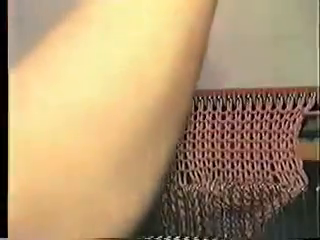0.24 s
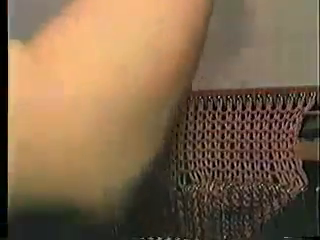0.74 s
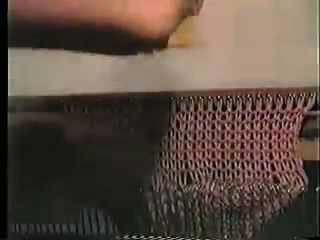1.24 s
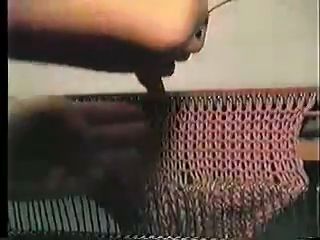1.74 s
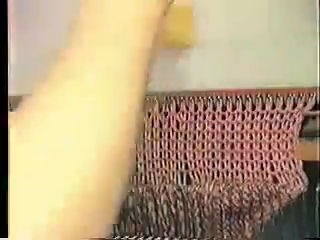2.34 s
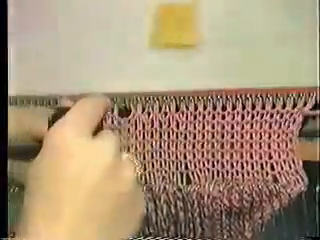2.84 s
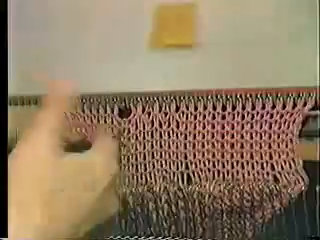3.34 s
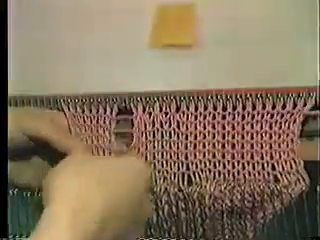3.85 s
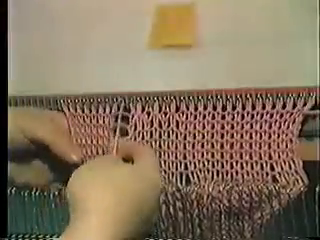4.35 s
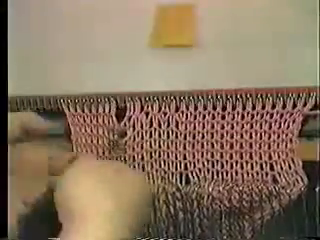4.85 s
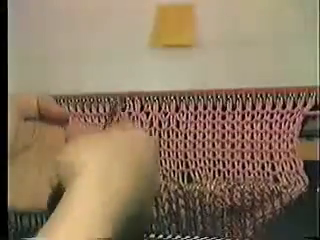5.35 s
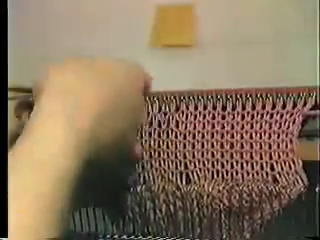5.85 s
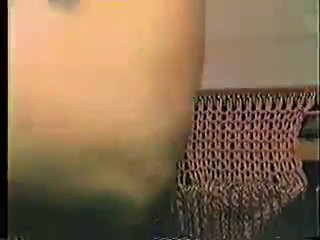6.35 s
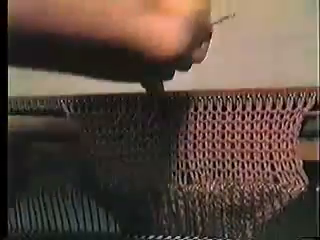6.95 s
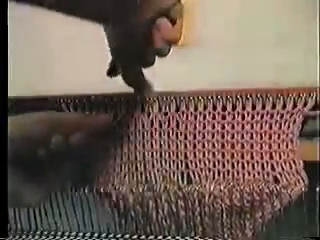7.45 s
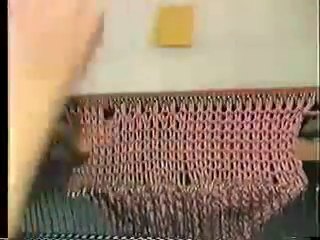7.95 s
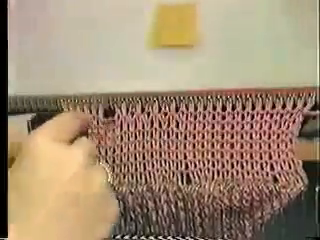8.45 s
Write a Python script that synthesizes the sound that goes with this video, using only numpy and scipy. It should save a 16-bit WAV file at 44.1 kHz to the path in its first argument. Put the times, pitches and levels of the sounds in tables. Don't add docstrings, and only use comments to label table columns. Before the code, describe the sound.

Irregular metallic handling on a needle bed: a couple of early knocks, a tight flurry around two seconds, a bright clack, then a quieter spell with small ticks and a muffled table thump. Louder clacks and sliding needles resume in the last part, ending in faint ticks. Everything is dry and quickly damped, with a short small-room echo, mono, with muffled upper treble, constant hiss, buzzy hum and a thin whine.

```python
import sys
import numpy as np
from scipy import signal
from scipy.io import wavfile
from scipy.ndimage import uniform_filter1d

SR = 44100
rng = np.random.default_rng(int(sys.argv[2]) if len(sys.argv) > 2 else 0)


def boost_factor(decibels):
    exponent = np.asarray(decibels, float) / 20
    return 10 ** exponent


def waveform_to_disk(signal):
    frames = np.transpose(np.atleast_2d(signal))
    scaled = np.clip(frames, -1, 1) * 32767
    samples = np.round(scaled).astype(np.int16)
    wavfile.write(sys.argv[1], SR, samples)


N = 383229
LEAD_S = 0.03
DAMPING = 2.1


def read(points, hz):
    f, value = np.transpose(points)
    return np.interp(np.log(hz + 1), np.log(f + 1), value)


def evened(x):
    return x / np.sqrt(np.mean(x ** 2) + 1e-20)


# (frequency [Hz], density [dB per Hz])
HISS_COLOUR = [(8.8, -53.5), (15, -18), (48, -1.5), (144, -2.5), (177, -4), (207, -4.5), (367, -9),
               (408, -9), (572, -12.5), (651, -12.5), (937, -14), (1010, -10), (1180, -15.5), (1660, -17),
               (7500, -28.5), (9750, -51), (16500, -120)]


def hiss():
    frames, hz = N // 256 + 5, np.fft.rfftfreq(1024, 1 / SR)
    real, imaginary, patches = rng.standard_normal((frames, 513, 3)).T
    patches = uniform_filter1d(patches, 14, 0)
    patches = evened(uniform_filter1d(patches, 10, 1))
    spectrum = (real + 1j * imaginary) * boost_factor(read(HISS_COLOUR, hz)[:, None] + 1.36 * patches)
    noise = signal.istft(spectrum, nperseg=1024, noverlap=768)[1][:N]
    return boost_factor(-41.5) * evened(noise)


# (multiple, level [dB rms])
HUM_LINES = [(1, -52), (3, -54), (5, -67), (7, -68), (9, -61.5), (11, -68), (13, -69), (15, -70.5),
             (17, -70), (21, -76), (25, -69), (27, -66), (31, -83.5), (33, -69), (39, -85)]
# (frequency [Hz], level [dB rms])
DRIVE_WHINE = [(845, -64.5), (996, -71), (1050, -70), (1470, -64.5), (1692, -64), (1865, -65)]


def hum():
    mains_hz = 59.94
    t = np.arange(N) / SR
    lines = [(round(k) * mains_hz, db) for k, db in HUM_LINES] + DRIVE_WHINE
    return sum(np.sqrt(2) * boost_factor(db) * np.sin(2 * np.pi * (hz * t + rng.random())) for hz, db in lines)


def add(mix, s, sound):
    part = mix[round(s * SR):][:len(sound)]
    part += sound[:len(part)]


def contacts(count, uneven_db=2.0, clumps_db=5.0):
    clumps = evened(uniform_filter1d(rng.standard_normal((count, 5000)), 100))
    spikes = np.minimum(rng.exponential(1, (count, 5000)), 4)
    noise = rng.standard_normal((count, 5000))
    return evened(noise * boost_factor(uneven_db * spikes + clumps_db * clumps))


def rattle(noise, length, rise=0.00097, lead_db=-22, lead=0.0066):
    t = np.arange(len(noise)) / SR - LEAD_S
    before = np.minimum(t, 0)
    swell = np.exp(before / rise) + boost_factor(lead_db) * np.exp(before / lead)
    shape = swell * np.exp(-np.maximum(t, 0) / max(length, 1e-3))
    return noise * shape * np.linalg.norm(shape) / np.linalg.norm(noise * shape)


def ring(modes, damping=1):
    t = np.arange(3000) / SR
    y = np.zeros(3000)
    for k, (hz, db, t60) in enumerate(modes):
        decay = boost_factor(db - 60 * damping * t / t60)
        build = 1 - np.exp(-t * hz / 2)
        y += (-1) ** k * decay * build * np.sin(2 * np.pi * hz * t)
    return y / np.linalg.norm(y)


def strike(drive, body):
    sound = signal.fftconvolve(drive, body)
    return sound * np.linalg.norm(drive) / np.linalg.norm(sound)


# (time [s], bed level [dB], small steel parts level [dB], brightness [dB], rattle length [s])
KNOCKS = [(.402, -30, -30.5, 1, 0.014), (.5209, -27.5, -24, 1.3, 0.0064), (1.137, -45, -44, 0, .022),
          (1.703, -41, -30, 0, 0.01), (1.8336, -19, -31, -2.5, 0.0074), (2.0307, -35, -25.5, 2.5, 0.009),
          (2.079, -41, -42, 3, 0.016), (2.1012, -21.5, -21.5, 0.5, .0043), (2.2085, -31.5, -29.5, 0, 0.01),
          (2.6375, -37, -42, 3.5, 0.023), (3.331, -25.5, -30, 3.5, 0.011), (5.045, -24.5, -32.5, 7, 0.0043),
          (5.617, -30, -36.5, 0.5, 0.016), (5.8316, -36, -30, 1, 0.0066), (5.918, -35, -30, 8, .0083),
          (6.229, -39.5, -58, -4, .013), (6.3939, -24, -21.5, -0.5, 0.019), (6.8319, -54, -45, 2, .011),
          (6.995, -38.5, -44.5, -4, 0.017), (7.3567, -22.5, -32.5, -2, 0.009),
          (7.5508, -34, -30.5, -3, 0.0042), (7.604, -22.5, -27.5, 0.5, 0.014)]
# (time [s], bed level [dB], small steel parts level [dB], brightness [dB])
TAPS = [(.165, -38.5, -47, -6.5), (.433, -33, -56, 0), (0.547, -32, -35, -4.5), (1.145, -40, -42, -4.5),
        (1.205, -53, -47, -6.5), (2.001, -38, -39.5, -4), (2.047, -38, -31.5, -9), (2.124, -35, -33.5, 0),
        (3.365, -39, -48, -16), (3.7517, -36.5, -48.5, -2), (5.4952, -34, -40, 1), (5.863, -36, -32, -3),
        (5.887, -37.5, -35, -4), (6.1, -35, -38.5, -2.5), (6.273, -36.5, -61, -5), (6.532, -44, -42.5, -6),
        (7.2975, -37.5, -41.5, -4), (7.587, -32, -39.5, -1), (7.665, -43, -45, 4),
        (7.7017, -36, -45.5, -9.5)]
# (frequency [Hz], level [dB], t60 [s])
BED = [(640, -22, .04), (775, -17, .05), (877, -14, .05), (948, -8, .06), (1040, -6, .06), (1120, 0, .09),
       (1206, -10, .05), (1330, -15, .03)]
PLATES = [(1480, -6, .012), (1700, -5, .012), (1920, -3, .015), (2110, -4, .013), (2300, 0, .018),
          (2500, -2, .018), (2680, -3, .018), (2830, -1, .02), (3080, -4, .012)]
LATCHES = [(3350, -6, .01), (3600, -4, .012), (3800, -2, .013), (4050, 0, .013), (4350, -2, .011),
           (4600, -2, .012), (4800, -1, .013), (5080, -4, .01)]
NEEDLES = [(5350, -6, .009), (5650, -6, .009), (5950, -5, .01), (6300, -4, .011), (6600, -3, .011),
           (6900, -2, .011), (7150, 0, .013), (7400, 0, .013), (7640, 0, .013)]
TABLE_TOP = [(222, -5, 0.019), (430, 2, .015)]
CASING = [(652, -3, 0.0079), (890, -3, 0.014), (1510, -3, 0.0052)]
PITCH_SPREAD = (.02, .008, .04, .03)


def knocks():
    tap_s, held = 0.0088, 2.8
    out = np.zeros(N)
    parts = NEEDLES, BED, PLATES, LATCHES
    dampings = DAMPING, DAMPING * held, DAMPING, DAMPING
    crack = ring([(1840, 0, 0.0011), (3370, -5, 0.0023), (5550, -4.5, 0.0012)])
    rows = KNOCKS + [(*tap, tap_s) for tap in TAPS]
    places = rng.uniform(-1.35, 1, (len(rows), 4, 2, 9))
    noises = contacts(4 * len(rows)).reshape(-1, 4, 5000)
    for (s, bed_db, steel_db, bright_db, length), noise, place in zip(rows, noises, places):
        start = s - LEAD_S
        levels_db = steel_db + bright_db, bed_db, steel_db - bright_db, steel_db - 1.5
        hardness = np.sqrt(0.33 + 0.0014 / length)
        blows = [rattle(row, length, rise=0.18 * length) * hardness for row in noise]
        for modes, db, blow, (shift, weight), spread, damping in zip(
                parts, levels_db, blows, place, PITCH_SPREAD, dampings):
            here = [(hz * (1 + spread * a), mode_db + 2 * b, t60)
                    for (hz, mode_db, t60), a, b in zip(modes, shift, weight)]
            add(out, start, boost_factor(db) * strike(blow, ring(here, damping)))
        add(out, start, boost_factor(bed_db - 20) * strike(blows[1], ring(TABLE_TOP)))
        add(out, start, boost_factor(bed_db - 2) * strike(blows[3], ring(CASING)))
        add(out, start, boost_factor(steel_db - 2) * strike(blows[2], crack))
    return out


# (frequency [Hz], t60 [s])
ROOM_DECAY = [(300, 0.76), (1000, 0.19), (3000, 0.21), (7500, 0.21)]


def room(x):
    hz, t, z = signal.stft(rng.standard_normal((3, SR // 2)), SR, nperseg=256)
    decay = boost_factor(-60 * t / read(ROOM_DECAY, hz)[:, None])
    tails = signal.istft(z * decay, SR, nperseg=256)[1]
    tails *= 1 - np.exp(-np.arange(tails.shape[1]) / SR / 0.001)
    tails /= np.linalg.norm(tails[0])
    turn = 2 * np.pi * (np.arange(N) / SR / 0.37 + np.arange(3)[:, None] / 3)
    sends = x * np.cos(turn) * np.sqrt(2 / 3)
    return signal.fftconvolve(sends, tails, axes=1)[:, :N].sum(0)


# (time [s], level [dB], pitch [Hz])
ACCENTS = [(0.405, -33, 2730), (.521, -28.5, 2460), (.53, -29.5, 2190), (1.705, -47, 2840),
           (2.002, -35.5, 3840), (2.079, -32, 2600), (2.105, -24, 3770), (2.639, -38, 1840),
           (2.645, -42, 6100), (3.331, -22, 4100), (3.331, -27, 1965), (3.332, -24.5, 2850),
           (3.343, -43, 5660), (3.365, -48, 2880), (3.367, -48, 4140), (3.907, -46.5, 5300),
           (5.047, -37, 2400), (5.047, -44.5, 3720), (5.048, -33, 6330), (5.452, -32, 6800),
           (5.617, -37.5, 5230), (5.832, -32.5, 4080), (5.868, -34, 3800), (5.876, -33, 3760),
           (5.922, -42.5, 7650), (6.397, -27, 6180), (6.4, -24, 2350), (7.359, -30.5, 3900),
           (7.556, -28.5, 4800), (7.606, -33.5, 2340),
           (1.85, -39, 744), (2.079, -35, 770), (2.11, -32.5, 630), (2.115, -28, 870), (2.64, -39, 834),
          (5.06, -30, 975), (6.398, -19.5, 1037), (6.41, -30.5, 750), (7.365, -30, 566),
          (7.359, -23.5, 1014), (7.616, -31.5, 486)]


def accents():
    out = np.zeros(N)
    rows = ACCENTS
    for (s, db, hz), noise in zip(rows, contacts(len(rows))):
        t60 = 0.025 * (1000 / hz) ** 0.12
        piece = ring([(1.052 * hz, -3, t60), (hz, 0, t60), (0.934 * hz, -4, t60)], DAMPING)
        add(out, s - LEAD_S, 1.77 * boost_factor(db) * strike(rattle(noise, 0.0032), piece))
    return out


# (time [s], level [dB])
PINGS = [(.433, -32), (.522, -20.5), (1.835, -13), (3.334, -20.5), (5.047, -26), (5.497, -32.5),
         (5.619, -17), (5.92, -34), (6.396, -17), (7.553, -24), (7.607, -26)]


def pings():
    out = np.zeros(N)
    free_bed = ring(BED[3:7], damping=1.4)
    for (s, db), noise in zip(PINGS, contacts(len(PINGS))):
        blow = rattle(noise, 0.0041, rise=0.00078, lead_db=-29)
        add(out, s - LEAD_S, boost_factor(db) * strike(blow, free_bed))
    return out


# (time [s], level [dB], pitch [Hz], rattle length [s], broad snap level [dB])
TICKS = [(1.7687, -24, 7650, 0.0025, -33), (2.355, -35, 8000, 0.002, -46),
         (2.378, -18.5, 8010, 0.0057, -45), (2.5117, -25.5, 7910, 0.0028, -42),
         (3.127, -39.5, 5660, 0.0045, -41), (3.151, -43, 5140, 0.0022, -45), (3.592, -47, 7450, 0.003, -49),
         (3.609, -31, 7700, 0.0037, -52.5), (3.625, -55, 7360, 0.003, -59), (3.711, -35, 7450, 0.002, -56),
         (3.849, -45, 7750, 0.0031, -56), (3.907, -35, 7900, 0.0024, -40),
         (5.3905, -39, 5870, 0.0027, -39.5), (5.451, -19.5, 7530, 0.0013, -30.5),
         (5.466, -47, 7270, 0.0017, -43), (6.728, -43.5, 7670, 0.0032, -48), (6.804, -42, 7700, 0.003, -49),
         (7.41, -47.5, 7600, 0.0037, -49), (7.9997, -37.5, 7200, 0.0047, -54),
         (8.043, -28, 7870, 0.0063, -51), (8.13, -44, 7560, 0.0066, -56), (8.144, -44, 7750, 0.003, -56),
         (8.225, -45, 5320, 0.0028, -41.5)]


def ticks():
    out = np.zeros(N)
    snap = ring(PLATES[7:] + LATCHES + NEEDLES[:6], damping=0.67)
    for (s, db, hz, length, snap_db), noise in zip(TICKS, contacts(len(TICKS))):
        needle = ring([(hz, 0, 0.012), (0.97 * hz, -3, 0.012), (0.92 * hz, -9, 0.01)])
        tick = rattle(noise, length, rise=0.0008, lead_db=-29)
        add(out, s - LEAD_S, boost_factor(db) * strike(tick, needle))
        add(out, s - LEAD_S, boost_factor(snap_db) * strike(rattle(noise, length, rise=0.0012), snap))
    return out


# (time [s], level [dB], pitch [Hz])
BUMPS = [
    (1.831, -23, 149),
    (3.833, -26, 173),
    (3.862, -20.5, 130),
    (3.895, -23.5, 94),
    (6.399, -30, 70.4),
]


def bumps():
    out, t = np.zeros(N), np.arange(8000) / SR
    for s, db, hz in BUMPS:
        swing = boost_factor(db - 60 * t / 0.086) * (1 - np.exp(-t / 0.015))
        add(out, s, swing * np.sin(2 * np.pi * hz * t))
    return out


# (start time [s], push [s], ease [s], level [dB], brightness [dB])
SLIDES = [(1.97, 0.076, .18, -35.5, -6), (3.3, 0.022, .012, -44, 3), (5.011, 0.01, .012, -41, 3),
          (5.36, 0.026, 0.034, -43, 5), (5.458, 0.01, 0.06, -40, -14), (5.79, 0.047, 0.056, -34.5, -3),
          (6.07, 0.026, 0.033, -40, 2), (6.8, .04, .02, -41, 2), (7.49, 0.074, .14, -33.5, -6.5),
          (7.97, .05, 0.088, -43, 3.5), (3.568, .04, 0.04, -59, 14), (2.328, .045, .08, -52, 11.5)]


def slides():
    out = np.zeros(N)
    needles, plates = ring(NEEDLES, damping=3.6), ring(PLATES, damping=1.5)
    latches = ring(LATCHES, damping=1.8)
    noises = contacts(6 * len(SLIDES)).reshape(-1, 3, 10000)
    for (s, push, ease, db, bright_db), noise in zip(SLIDES, noises):
        t = np.arange(0, push + ease, 1 / SR)[:10000]
        stroke_db = db + np.interp(t, [0, push, push + ease], [-10.5, 0, -10.5])
        rub = boost_factor(stroke_db - 6.5) * signal.windows.tukey(len(t), 0.2) * noise[:, :len(t)]
        add(out, s, strike(rub[0] * boost_factor(bright_db), needles))
        add(out, s, strike(0.59 * rub[1], plates))
        add(out, s, strike(0.89 * rub[2], latches))
    return out


def scene():
    metal = knocks() + slides() + ticks() + pings()
    pieces = accents()
    echo = boost_factor(-4.0) * room(metal + 0.7 * pieces)
    return np.tile(metal + pieces + echo + bumps() + hiss() + hum(), (2, 1))


def roll_off(x):
    return signal.sosfilt(signal.butter(12, 8810, fs=SR, output="sos"), x)


def record(dry):
    below = signal.firwin(1201, 7680, window=("kaiser", 8), fs=SR)[None]
    narrow = signal.oaconvolve(dry, below, "same")
    treble = signal.sosfilt(signal.butter(6, 7200, "high", fs=SR, output="sos"), narrow)
    roughness = evened(signal.lfilter([1], [1, -2 * 0.972, 0.972 ** 2], rng.standard_normal(N)))
    smeared = treble * roughness
    spill = boost_factor(-22.5) * (smeared - signal.oaconvolve(smeared, below, "same"))
    return roll_off(narrow + spill)


dry = scene()
out = record(dry)
waveform_to_disk(out)
```